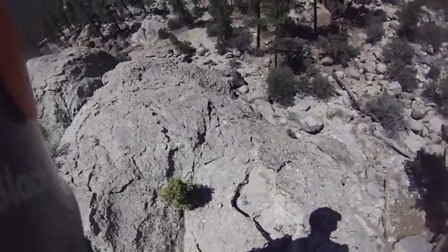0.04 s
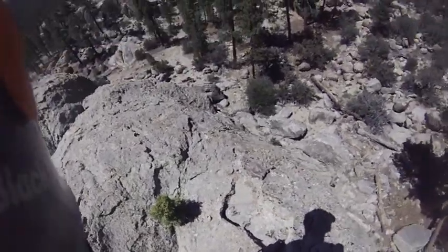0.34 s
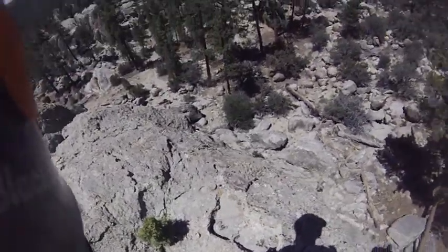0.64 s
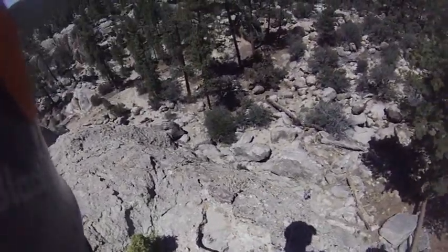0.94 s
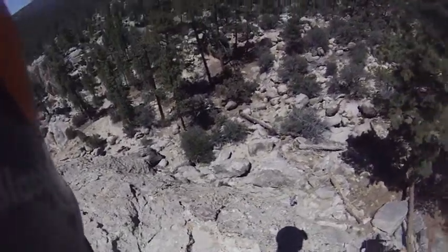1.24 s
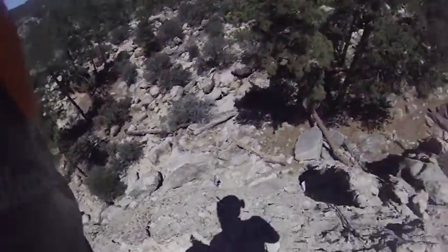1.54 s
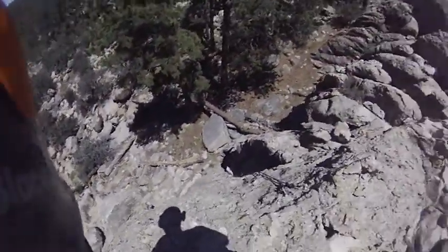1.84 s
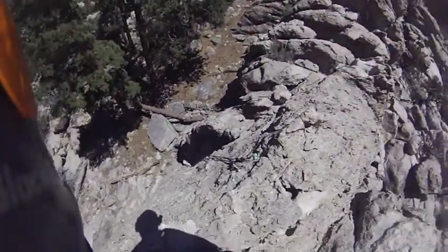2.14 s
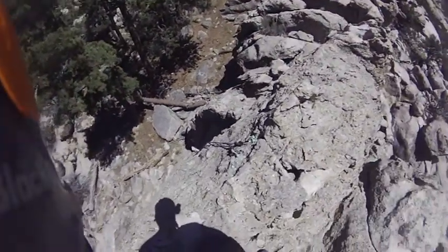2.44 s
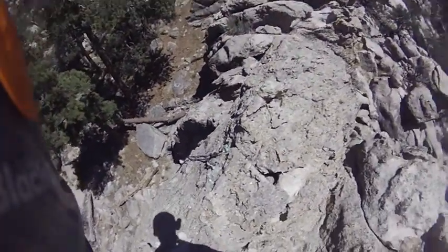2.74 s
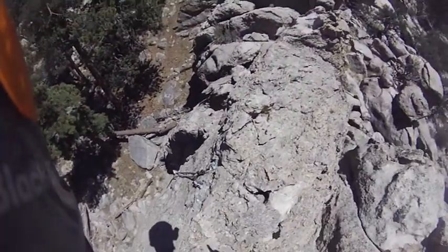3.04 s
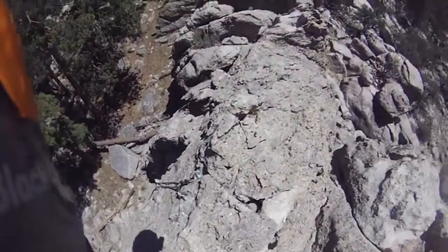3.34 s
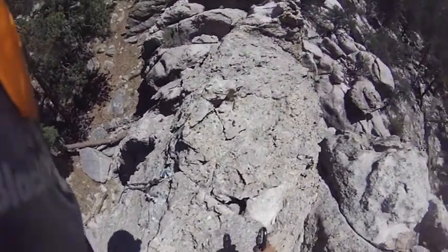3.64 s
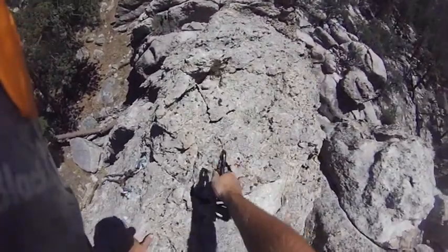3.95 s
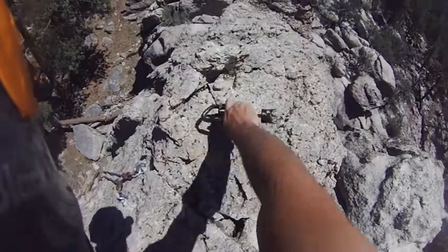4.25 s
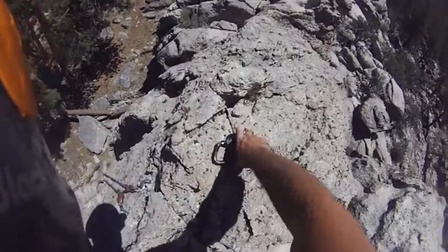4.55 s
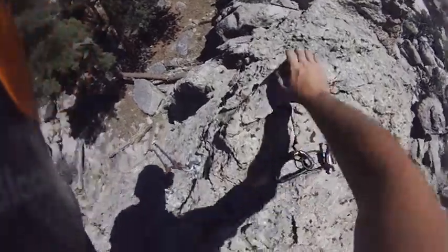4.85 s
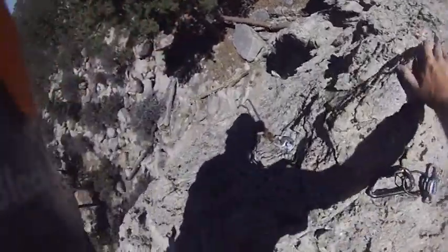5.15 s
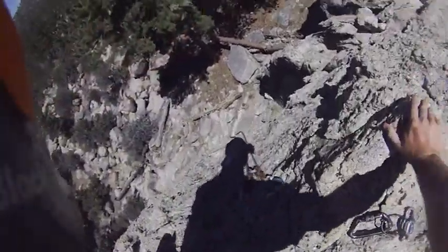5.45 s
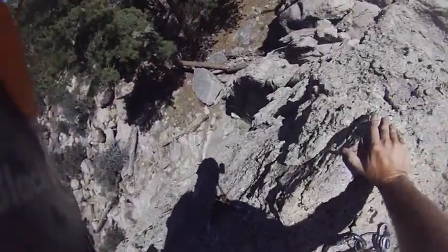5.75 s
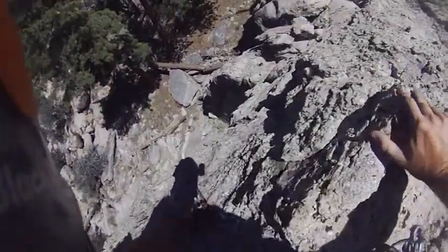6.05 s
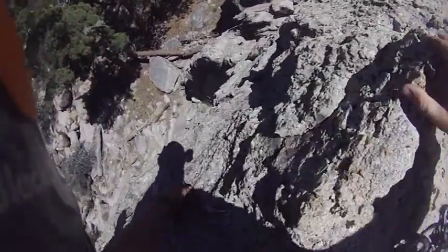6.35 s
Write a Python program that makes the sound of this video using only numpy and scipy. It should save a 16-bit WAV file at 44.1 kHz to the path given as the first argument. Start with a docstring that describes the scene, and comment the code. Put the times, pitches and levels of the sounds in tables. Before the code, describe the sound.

Wind buffets a close microphone in two main gusts, and between them metal gear clicks and scrapes on stone.

```python
"""Gusty wind buffeting a small body-worn microphone, on a climber high on a crag.
Eddies hit the port as rumble and thumps, and flutter where the flow tears off the housing.
At arm's length a sleeve rustles, metal gear is knocked and dragged into a crack, and hanging
carabiners clink faintly; the rock face gives the metal a short, dull echo. Far behind is the
hiss of wind in pines, which sinks around the strongest gusts. The sound is almost mono."""
import sys
import numpy as np
from scipy import signal
from scipy.fft import rfft, irfft
from scipy.io import wavfile
from scipy.ndimage import uniform_filter1d

SR = 44100
rng = np.random.default_rng(int(sys.argv[2]) if len(sys.argv) > 2 else 0)


def master_out(mix):
    """Clip the mix to full scale and print it as 16-bit PCM to the path in sys.argv[1]."""
    frames = np.transpose(np.atleast_2d(mix))
    ceiling = np.clip(frames, -1, 1)
    pcm = np.round(ceiling * 32767).astype(np.int16)
    wavfile.write(sys.argv[1], SR, pcm)


N = 287091
TIME = np.arange(N) / SR

# Steady wind at the port, rising to two gusts. Each row: time in seconds, relative level in dB.
BREEZE = [(0.0, -59), (0.6, -66), (0.85, -54.5), (1.32, -44), (1.74, -37.5), (2.0, -35.5), (2.2, -55.5),
          (2.48, -64), (2.75, -66), (3.15, -68.5), (4.11, -57), (4.59, -58.5), (5.08, -48), (5.3, -39.5),
          (5.53, -61), (5.7, -56), (5.92, -55), (6.51, -59.5)]
# Puffs riding on it. Each row: crest in seconds, relative level in dB, half-length in seconds.
PUFFS = [(0.085, -57, 0.0099), (0.285, -49.5, 0.023), (0.52, -56, 0.013), (0.67, -47, 0.033),
         (0.755, -44.5, 0.04), (0.875, -41, 0.02), (0.975, -42, 0.061), (1.14, -43, 0.011),
         (1.24, -38, 0.013), (1.37, -38, 0.026), (1.51, -40, 0.052), (1.62, -40.5, 0.052),
         (1.755, -29, 0.052), (1.865, -28, 0.027), (2.085, -35.5, 0.064), (2.28, -45, 0.031),
         (2.345, -47.5, 0.015), (2.425, -49, 0.01), (2.73, -64.5, 0.041), (3.6, -54, 0.011),
         (3.925, -53.5, 0.037), (4.01, -42.5, 0.0091), (4.48, -54.5, 0.12), (4.58, -40.5, 0.0058),
         (4.9, -47.5, 0.044), (5.155, -36, 0.022), (5.225, -33, 0.048), (5.335, -36.5, 0.05),
         (5.405, -36.5, 0.026), (5.475, -41.5, 0.023), (5.605, -38.5, 0.037), (5.665, -37.5, 0.036),
         (5.77, -45.5, 0.071), (5.86, -47, 0.0081), (6.005, -39, 0.026), (6.12, -42.5, 0.013),
         (6.245, -47.5, .02), (6.32, -44.5, 0.042), (6.415, -49.5, 0.024)]
# Slow, deep pressure swings. Each row: crest in seconds, level in dB, half-length in seconds.
SURGES = [(0.09, -54, .04), (0.3, -50, 0.053), (1.6, -42, 0.082), (4.0, -52.5, .05), (4.5, -52, 0.14),
          (4.9, -51.5, 0.12), (5.42, -43, 0.055)]
# The port turns across the wind and adds flutter.
# Each row: crest in seconds, added share of flutter in dB, half-length in seconds.
CROSSWIND = [(1.55, 2.5, 0.13), (2.03, 1, 0.17)]
# Large eddies hitting the port.
# Each row: start in seconds, thump level in dB, pitch in Hz, crackle level in dB.
BUFFETS = [(0.273, -36.5, 204, -78), (1.353, -27, 400, -51.5), (1.496, -26, 503, -45.5),
           (1.575, -28, 613, -45.5), (1.620, -19.5, 200, -66), (1.686, -35, 404, -46),
           (1.777, -26, 124, -38.5), (1.954, -24, 325, -45), (1.929, -31, 250, -61), (2.05, -25, 465, -35),
           (3.904, -46, 545, -48), (4.008, -41, 131, -71), (4.134, -42, 151, -77), (4.23, -44, 172, -62),
           (5.150, -27, 450, -52), (5.185, -22, 310, -58), (5.226, -15, 218, -60), (5.235, -19.5, 583, -70),
           (5.329, -20, 234, -68), (5.653, -44, 520, -60), (5.803, -36.5, 477, -67), (5.956, -30, 184, -70),
           (5.999, -28, 170, -64), (6.157, -45, 684, -73), (6.316, -31, 218, -75)]
# Four colours of wind on the microphone. Each row: frequency in Hz, relative level in dB.
DRAUGHT_SPECTRUM = [(15, -7), (32, 1), (65, 5), (95, 2), (140, -9), (400, -61.5)]
RUMBLE_SPECTRUM = [(15, -44), (30, -24.5), (65, -7), (120, 2.5), (200, 2), (340, -3), (460, -8.5),
                   (620, -19.5), (900, -29.5), (1500, -63)]
FLUTTER_SPECTRUM = [(250, -13), (450, 5.5), (680, 1.5), (950, -8.5), (1300, -15.5), (1800, -23.5),
                    (2500, -33.5), (3500, -44), (8000, -63)]
CRACKLE_SPECTRUM = [(300, -30), (700, 15), (1400, 6.5), (2300, -7), (3100, -16), (4000, -34), (12000, -34)]

# Gear striking stone at arm's length.
# Each row: start in seconds, relative knock and crunch levels in dB, contact length in seconds.
KNOCKS = [(0.9539, -58, -58, 0.0039), (4.6359, -30.5, -32.5, 0.0066), (4.6680, -18.5, -47, 0.0063),
          (4.6758, -23.5, -51, 0.0015), (4.679, -40, -43.5, 0.005), (4.748, -22.5, -46.5, 0.0051),
          (4.7630, -36, -46, 0.0024), (4.8050, -21.5, -47.5, 0.0056), (4.8170, -28, -57, 0.0015),
          (4.839, -30.5, -63, 0.0039), (4.879, -22.5, -35.5, 0.008), (4.9328, -36, -69, .004),
          (4.944, -31, -44.5, 0.0024), (4.9570, -45, -59, 0.0062), (5.0270, -56, -76, 0.0034),
          (5.1130, -40, -53, 0.0022), (5.811, -78, -59.5, 0.013), (6, -48, -58.5, 0.0068),
          (6.0880, -55, -60, 0.0039), (6.191, -68, -56.5, 0.0099)]
# Gear dragging between knocks. Each row: crest in seconds, level in dB, half-length in seconds.
DRAGS = [(4.72, -57, 0.13), (4.83, -44, 0.033), (4.945, -42, 0.02), (5.04, -60, 0.011)]
# Grit crushed under metal. Each row: frequency in Hz, relative level in dB.
GRIT_SPECTRUM = [(700, -2), (1800, 7.5), (2500, 5), (3300, 1), (4500, 2), (6500, -4), (8400, 0.5),
                 (9800, -8), (11800, 4), (13800, -28), (15200, -8), (16000, -33)]
# Carabiners touching. Each row: start in seconds, level in dB, decay time of the rub in seconds.
CLINKS = [(0.262, -52.5, 0.022), (0.389, -49.5, 0.0075), (0.493, -61, 0.022), (0.61, -60, 0.058),
          (0.685, -57, 0.023), (0.915, -60, .006), (0.953, -42, 0.0039)]
# The dull ring of wedged gear, the bright ring of its metal, and the ring of the carabiners.
# Each row: frequency in Hz, relative level in dB, seconds to fall by 60 dB.
WEDGED_MODES = [(656, -5, 0.035), (770, -6, 0.031), (940, -3.5, 0.012), (1340, -2, 0.0092),
                (1714, 2, 0.0055), (1920, 1, 0.0085), (2290, -7.5, 0.0059)]
BRIGHT_MODES = [(4040, -13, 0.027), (4470, -4.5, 0.014), (7290, -10.5, 0.0037), (7540, -3.5, 0.02),
                (8900, -14.5, 0.012), (10940, -5, 0.01), (13300, -6, 0.0068), (15200, -9, 0.0081)]
CARABINER_MODES = [(2210, -7, 0.045), (2450, -11, 0.06), (2650, -9, 0.017), (5100, -15, .015),
                   (7800, -17, 0.014), (9600, -22, 0.014)]
# A small metal piece tinkling. Each row: start in seconds, level in dB.
TINKS = [(1.396, -62), (1.46, -68)]
# The sleeve as the arm reaches out. Each row: crest in seconds, level in dB, half-length in seconds.
RUSTLES = [(4.0, -68.5, 0.15), (4.37, -59.5, 0.11), (5.1, -59, 0.16)]
# Rubbed cloth. Each row: frequency in Hz, relative level in dB.
CLOTH_SPECTRUM = [(300, -8), (800, 13.5), (1500, -8), (3200, -6.5), (4600, -3.5), (5600, -14), (12000, -19)]

# Rise and fall of the background. Each row: time in seconds, relative level in dB.
BACKGROUND_LEVELS = [(0.0, -69.5), (1.41, -69.5), (1.59, -70), (1.87, -81), (2.34, -81.5), (3.52, -70.5),
                     (3.62, -69.5), (4.99, -70), (5.35, -74.5), (5.86, -74.5), (6.11, -70.5), (6.51, -74.5)]
# Colour of the background hiss. Each row: frequency in Hz, relative level in dB.
AIR_SPECTRUM = [(100, 22.5), (400, 14), (620, 14), (800, 12), (1100, 9), (1700, 7), (2200, 6), (3000, 2.5),
                (4600, 2.5), (6000, 0), (12000, -1), (15000, -3), (16000, -16)]
# Faint noise that differs between left and right. Each row: frequency in Hz, relative level in dB.
SIDE_NOISE_SPECTRUM = [(60, -26), (300, 3.5), (1000, 7), (3000, 4.5), (6600, 4), (7300, -22)]

GUST_DB = -33.5   # rumble of a strong gust
DRAUGHT_DB, DRAUGHT_FOLLOWS = -49.5, 0.48   # deep swings in such a gust; dB per dB of rumble
FLUTTER_DB, FLUTTER_FOLLOWS, FLUTTER_LIMIT_DB = -47, 1.69, -41   # outgrows the rumble, up to a limit


def wind(lumpy_db=4.5, burst_db=4.5, breeze_db=-0.5, puff_db=1.5, waver_db=2.0):
    """Right on the port, one wavering flow drives deep swings, rumble and flutter; eddies add lumps, and slow
    surges add further deep swings."""
    waver = evened(from_db(waver_db * drift(15.5)), window_s=0.11)
    breeze = level(BREEZE) * from_db(breeze_db) * waver
    flow = np.hypot(breeze, from_db(puff_db) * swells(PUFFS))
    strength = flow / from_db(GUST_DB)
    eddies = drift(38.3)
    swing = np.hypot(from_db(DRAUGHT_DB) * strength ** DRAUGHT_FOLLOWS, swells(SURGES))
    draught = swing * evened(noise(DRAUGHT_SPECTRUM), window_s=0.13)
    rumble = flow * evened(noise(RUMBLE_SPECTRUM) * from_db(lumpy_db * eddies), window_s=0.044)
    # the fastest eddies tear off the housing in bursts
    bursts = np.minimum(.5 * eddies + 1.4 * drift(123), 2)
    drive = from_db(FLUTTER_DB - FLUTTER_LIMIT_DB) * strength ** FLUTTER_FOLLOWS
    tearing = from_db(FLUTTER_LIMIT_DB) * np.tanh(drive) * (1 + swells(CROSSWIND))
    flutter = tearing * evened(noise(FLUTTER_SPECTRUM) * from_db(burst_db * bursts), window_s=0.042)
    return draught + rumble + flutter


def buffets(rise_cycles=0.52, crackle_s=0.0039):
    """A large eddy shoves the diaphragm, which swings back within a few cycles; its edge crackles."""
    thumps, edges, t = np.zeros(N), np.zeros(N), TIME[:SR // 20]
    for s, db, hz, crackle_db in BUFFETS:
        age = t * hz / rise_cycles
        shove = (age * np.exp(1 - age)) ** 2
        add(thumps, s, from_db(db) * shove * np.sin(2 * np.pi * hz * t))
        edge = 2 * t / crackle_s * np.exp(-t / crackle_s)
        add(edges, s, from_db(crackle_db) * edge * rng.standard_normal(len(t)))
    return thumps + coloured(edges, CRACKLE_SPECTRUM)


def gear(skid_db=-31, knock_db=-1, crunch_db=-4, metal_db=-23, grain_db=3.5, bite_s=0.00023):
    """At arm's length metal hits stone and skids over crystals: a dull knock, a crunch, a short ring."""
    knocks, grit, t = np.zeros(N), np.zeros(N), TIME[:SR // 10]
    for s, blow_db, grit_db, contact_s in KNOCKS:
        contact = (1 - np.exp(-t / bite_s)) * np.exp(-(t / contact_s) ** 4)
        skid, grains, size = rng.standard_normal((3, len(t)))
        # the ring shifts a little with every new point of contact
        modes = [(hz * (1 + 0.021 * rng.standard_normal()), db, t60) for hz, db, t60 in WEDGED_MODES]
        force = (t == 0) + from_db(skid_db) * skid * contact
        add(knocks, s, from_db(blow_db) * struck(force, modes))
        add(grit, s, from_db(grit_db + grain_db * np.clip(size, -2, 2)) * grains * contact)
    crunch = from_db(crunch_db) * coloured(grit, GRIT_SPECTRUM)
    bright_ring = from_db(metal_db) * struck(grit, BRIGHT_MODES)
    return from_db(knock_db) * knocks + crunch + bright_ring


def drag(slips_per_s=1600, size_db=3.5, gritty_db=-17):
    """Metal dragged in the crack catches on crystals in many tiny slips."""
    slips = (rng.random(N) < slips_per_s / SR) * rng.choice([-1, 1], N)
    slips = slips * from_db(size_db * rng.standard_normal(N))
    dull = coloured(slips, [(400, -11), (620, -2), (780, 8.5), (1100, -4.5),
                            (1500, -5), (1900, -5), (2500, -21), (3500, -32.5)])
    gritty = from_db(gritty_db) * rms_one(coloured(slips, GRIT_SPECTRUM))
    return swells(DRAGS) * (evened(dull, window_s=0.045) + gritty)


def carabiners(rub_db=-23):
    """Carabiners hanging close by touch lightly; a short rub keeps each touch ringing."""
    force, t = np.zeros(N), TIME[:SR // 5]
    for s, db, rub_s in CLINKS:
        rub = from_db(rub_db) * np.exp(-t / rub_s) * rng.standard_normal(len(t))
        add(force, s, from_db(db) * ((t == 0) + rub))
    return struck(force, CARABINER_MODES)


def tinks(hz=5920, t60_s=0.12):
    """Each light touch rings one high mode of a small metal piece."""
    force = np.zeros(N)
    for s, db in TINKS:
        add(force, s, [from_db(db)])
    return ring(force, hz, t60_s)


def sleeve(uneven_db=3.0):
    """Cloth near the microphone slides and catches unevenly."""
    return swells(RUSTLES) * rms_one(noise(CLOTH_SPECTRUM) * from_db(uneven_db * drift(40)))


def rock_face(x, decay_s=0.029, wet_db=-22, dull_hz=2500):
    """Rough stone close by scatters a short, dull echo."""
    t = TIME[:SR // 5]
    lowpass = signal.butter(2, dull_hz, fs=SR, output="sos")
    scatter = signal.sosfilt(lowpass, rng.standard_normal(len(t))) * np.exp(-t / decay_s)
    echo = signal.fftconvolve(x, scatter / np.linalg.norm(scatter))[:N]
    return from_db(wet_db) * echo * np.sqrt(2 * dull_hz / SR)


def air(air_db=8.0):
    """Distant wind in the pines and the microphone's own hiss."""
    return level(BACKGROUND_LEVELS) * from_db(air_db) * noise(AIR_SPECTRUM)


def from_db(db):
    """Decibels to gain."""
    return 10 ** (np.asarray(db) / 20)


def rms_one(x):
    """Scale to unit power."""
    return x / np.sqrt(np.mean(x ** 2) + 1e-20)


def level(rows):
    """Gain in time through points of seconds and dB, silent outside them."""
    s, db = np.transpose(rows)
    return from_db(np.interp(TIME, s, db, left=-120, right=-120))


def swells(rows):
    """Gain in time from bell-shaped swells, whose powers add."""
    powers = (from_db(db) ** 2 * np.exp(-np.minimum(2 * ((TIME - crest_s) / half_s) ** 2, 100))
              for crest_s, db, half_s in rows)
    return np.sqrt(sum(powers))


def coloured(x, spectrum, size=2048):
    """Give a signal a spectrum through a causal (minimum-phase) filter of unit power."""
    hz, db = np.transpose(spectrum)
    grid_hz = np.maximum(np.arange(size + 1) * SR / (2 * size), 1)
    gains = from_db(np.interp(np.log(grid_hz), np.log(hz), db))
    cepstrum = irfft(np.log(gains))
    lag = np.arange(2 * size)
    response = irfft(np.exp(rfft(2 * cepstrum * (lag > 0) * (lag < size))))
    return signal.fftconvolve(x, response / np.linalg.norm(response))[:N]


def noise(spectrum):
    """Coloured noise of unit power."""
    return rms_one(coloured(rng.standard_normal(N), spectrum))


def drift(rate_hz):
    """Smooth random wander of unit power."""
    r = np.exp(-2 * np.pi * rate_hz / SR)
    return rms_one(signal.lfilter([1], [1, -2 * r, r * r], rng.standard_normal(N + SR))[SR:])


def evened(x, window_s):
    """Hold the mean power at 1 while faster lumps remain."""
    size = max(int(window_s * SR), 2)
    return x / np.sqrt(uniform_filter1d(uniform_filter1d(x ** 2, size), size) + 1e-12)


def ring(clicks, hz, t60):
    """A unit click sets a sine of height 1 ringing."""
    r, w = from_db(-60 / (t60 * SR)), 2 * np.pi * hz / SR
    return signal.lfilter([0, np.sin(w)], [1, -2 * r * np.cos(w), r * r], clicks + 1e-18)


def struck(force, modes):
    """A body's modes in parallel, with alternating signs."""
    return sum((-1) ** k * from_db(db) * ring(force, hz, t60) for k, (hz, db, t60) in enumerate(modes))


def add(track, s, sound):
    """Mix a sound in at a time in seconds."""
    start = int(s * SR)
    track[start:start + len(sound)] += sound[:N - start]


def scene(side_floor_db=-8, side_low_db=-33, side_burst_db=-7):
    """Both channels are nearly the same; a faint noise differs between left and right."""
    metal = gear() + drag() + carabiners() + tinks()
    mid = wind() + buffets() + metal + rock_face(metal) + sleeve() + air()
    # the faint noise follows the level of the background hiss
    side = from_db(side_floor_db) * level(BACKGROUND_LEVELS) * noise(SIDE_NOISE_SPECTRUM)
    side += from_db(side_low_db) * wind()
    side += from_db(side_burst_db) * rock_face(metal)
    return np.array([mid + side, mid - side])


def record(dry, cutoff_hz=15500):
    """The highest treble is cut steeply."""
    return signal.sosfilt(signal.ellip(10, .2, 70, cutoff_hz, fs=SR, output="sos"), dry)


dry = scene()
out = record(dry)
master_out(out)
```